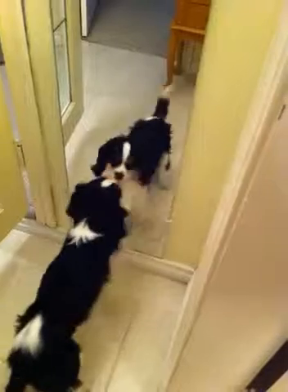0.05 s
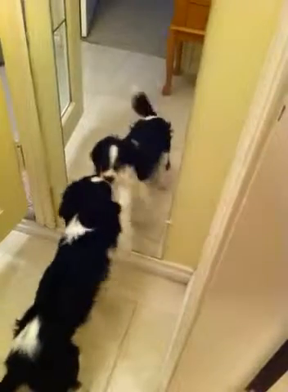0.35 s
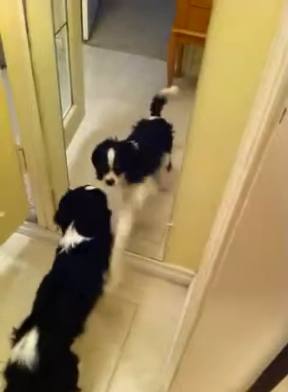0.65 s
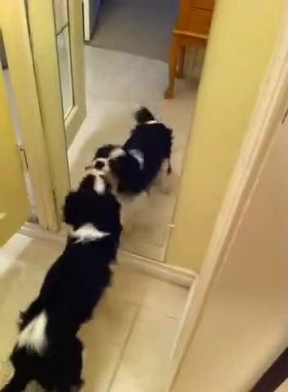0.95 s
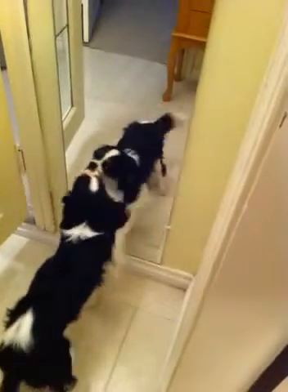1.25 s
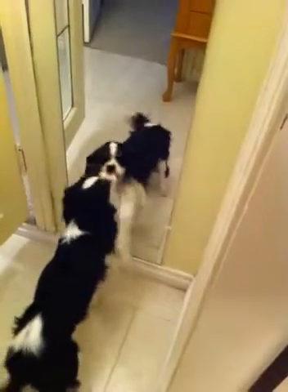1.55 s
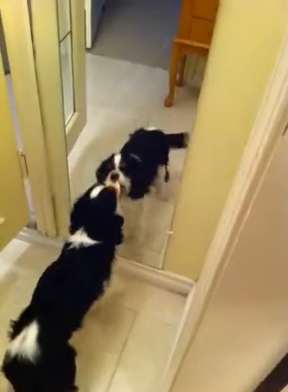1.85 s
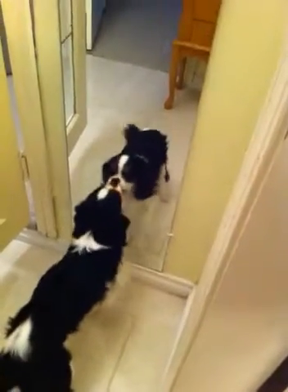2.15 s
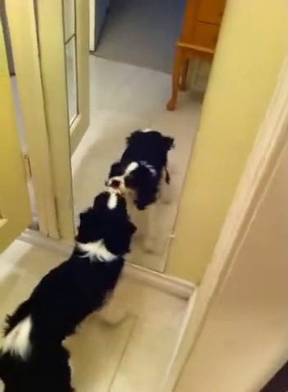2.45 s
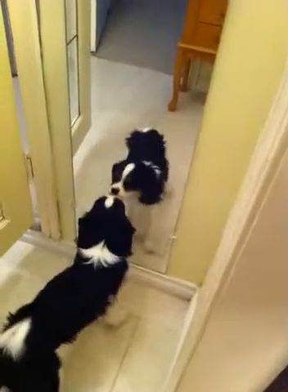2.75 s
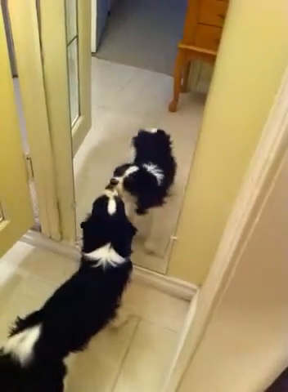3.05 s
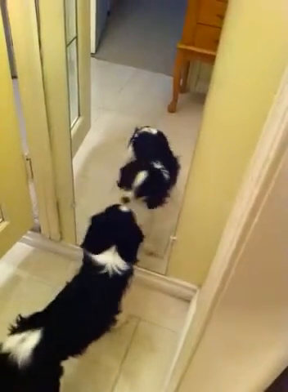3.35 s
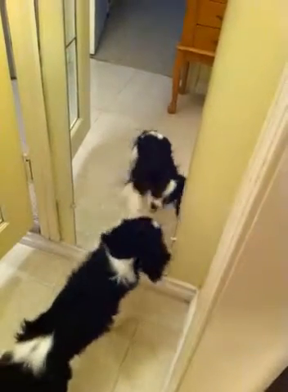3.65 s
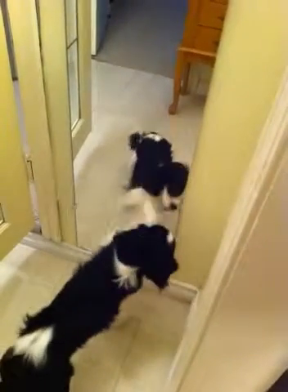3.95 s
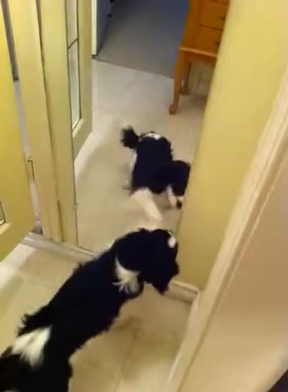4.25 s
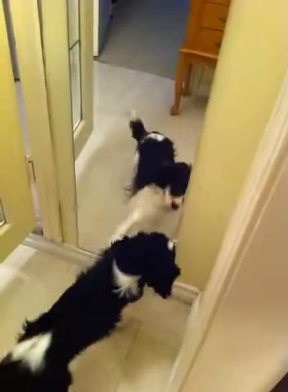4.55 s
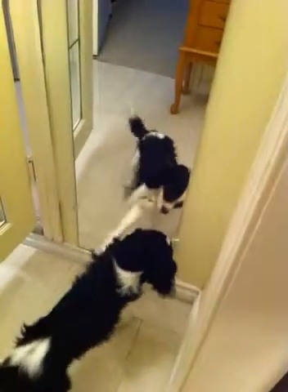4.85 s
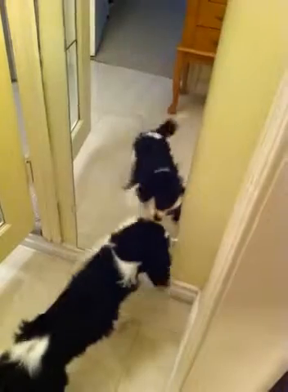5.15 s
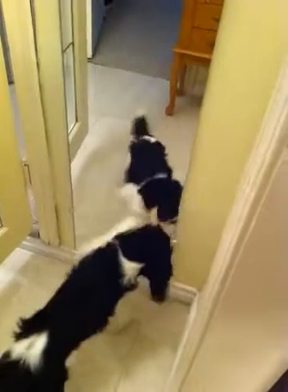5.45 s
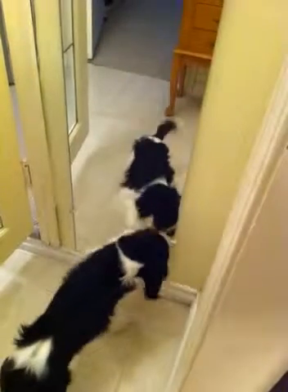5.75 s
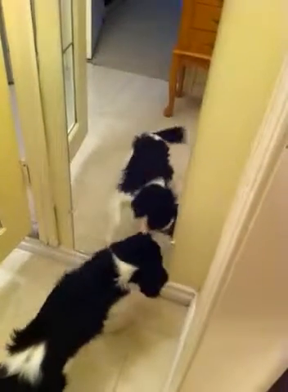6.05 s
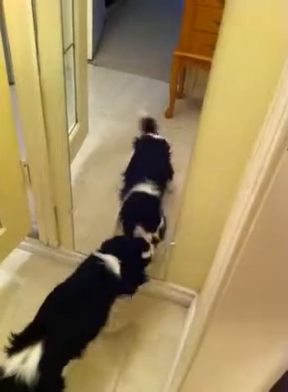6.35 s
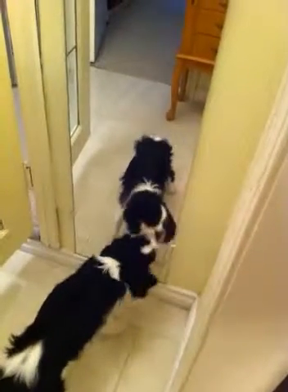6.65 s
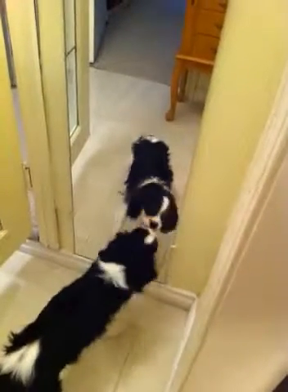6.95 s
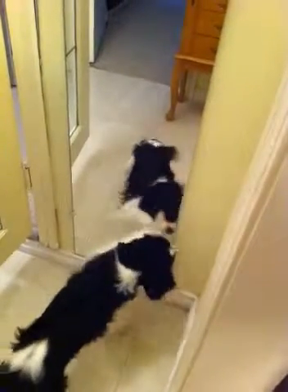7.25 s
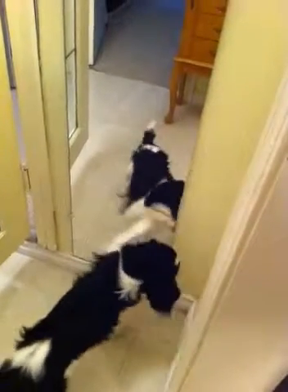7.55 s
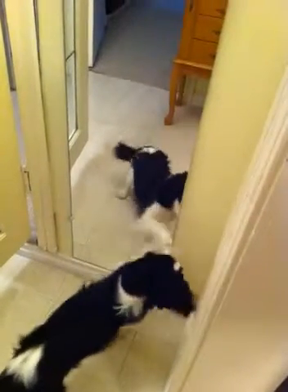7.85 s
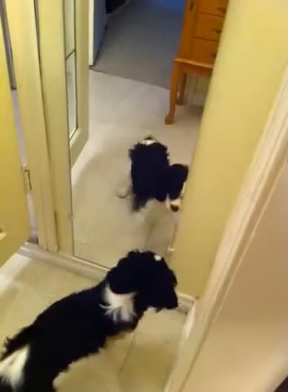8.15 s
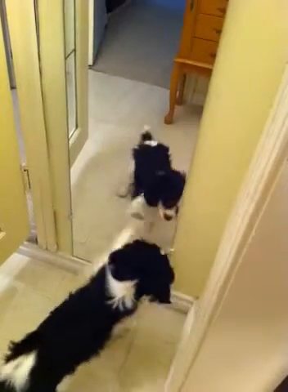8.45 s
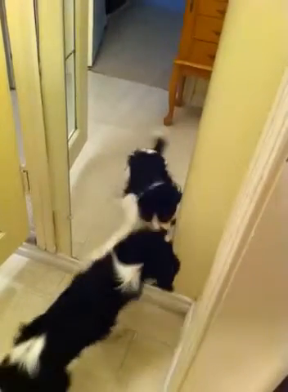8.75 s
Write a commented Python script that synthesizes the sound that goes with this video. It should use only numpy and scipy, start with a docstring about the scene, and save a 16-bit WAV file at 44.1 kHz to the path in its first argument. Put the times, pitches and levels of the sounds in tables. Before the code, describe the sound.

Sharp little claw clicks come in irregular clusters as a puppy taps a mirror and a tiled floor in a hallway. Light rubs, dull muzzle ticks and an occasional hollow bump of the door panel mix in. After a lull come several stronger single taps, then a burst of scratching and one last click. Faint fur rustle and low ventilation hum lie underneath, heard through a single microphone.

```python
"""In a tiled hallway a puppy paws at a mirrored closet door. Its claws click on glass and floor,
each impact exciting the resonances of the struck surface; pads and muzzle make duller ticks.
Sliding paws rub by stick-slip friction, and an occasional bump sets the door panel booming in its
low modes. The hard walls reverberate briefly, over a faint rustle of fur and a low ventilation hum."""
import sys
import numpy as np
from scipy import signal
from scipy.fft import rfft, irfft, next_fast_len
from scipy.io import wavfile
from scipy.ndimage import map_coordinates

SR = 44100
rng = np.random.default_rng(int(sys.argv[2]) if len(sys.argv) > 2 else 0)


def waveform_to_disk(signal):
    """Save audio, clipped to [-1, 1], as 16-bit WAV at the path in sys.argv[1]."""
    frames = np.transpose(np.atleast_2d(signal))
    scaled = np.clip(frames, -1, 1) * 32767
    samples = np.round(scaled).astype(np.int16)
    wavfile.write(sys.argv[1], SR, samples)


N = 388080

# claw impacts: (time [s], relative level [dB], body [dB], edge [dB], rebound delay [ms], ring [Hz])
CLAW_STRIKES = [(0.1842, -51.5, 0, -0.5, 1.12, 4100), (0.3267, -55.5, 7.5, -22, 0.54, 3300),
                (0.3824, -63.5, -7, -1.5, 0.29, 4170), (0.8224, -43, -4, -5.5, 0.42, 4050),
                (1.085, -63.5, 9.5, 5.5, 0.28, 4300), (1.2524, -58, -2, -2, 1.06, 4140),
                (1.567, -37.5, -8, 1.5, 0.76, 4050), (1.5826, -46, -4, -24, 0.36, 2430),
                (1.8749, -66.5, 15, -21, 1.3, 2900), (1.936, -65.5, 13, 1, 0.27, 4050),
                (3.5133, -44, -4, 2, 0.53, 4180), (3.555, -51.5, -3, -2.5, 0.35, 4100),
                (3.86, -33.5, -5, 1.5, 2.3, 4120), (4.185, -31, -4.5, 2.5, 1.37, 2270),
                (4.511, -30.5, -3.5, 3, 1.06, 4100), (4.864, -29, -4, -2, 0.86, 3500),
                (5.031, -59, -6, 2.5, 0.41, 4240), (5.2, -37.5, -2, -5.5, 0.75, 4150),
                (5.288, -66, 0, 1, 0.45, 5500), (5.549, -64, 7, -7, 0.77, 4300),
                (5.7714, -60.5, -6, -1.5, 0.28, 5580), (5.867, -50.5, 5.5, -3, 0.32, 1090),
                (6.398, -60, -4, 7.5, 0.22, 6600), (7.1954, -42.5, 4.5, -15, 0.976, 2550),
                (7.253, -62.5, 11.5, -18, 0.59, 4270), (7.548, -37.5, -3, -3, 0.52, 4770),
                (7.567, -40.5, -6, -0.5, 0.59, 5140), (7.6973, -36.5, 3, -2, 1, 3630),
                (7.709, -37, 3.5, -9, 0.29, 5200), (7.8387, -47.5, -4, -7, 0.34, 4280),
                (7.862, -49.5, -6, 0, 0.38, 4250), (7.978, -45, -7, -4, 0.45, 4170),
                (7.9927, -41.5, 2, -9, 0.38, 7900), (8.237, -61, -9, 8.5, 0.21, 6500),
                (8.5939, -30, -7.5, -2, 0.58, 1600)]
# spectrum of a claw contact: (frequency [Hz], relative level [dB])
CLAW_SPECTRUM = [(60, -17), (350, -29.5), (750, -4.5), (1200, -3.5), (2500, -0.5), (3600, -0.5),
                 (5000, -0.5), (8000, 0.5), (13000, -0.5), (15500, -4.5)]
# modes of the mirror glass: (frequency [Hz], relative level [dB])
GLASS_MODES = [(2920, -4), (3430, 2), (3900, 1), (4754, -41), (5700, -2), (5930, 5), (6550, 0.5),
               (7350, -15), (7550, -5), (8310, -2), (8708, -16), (9170, -6), (10000, 2.5), (10750, -1),
               (11395, -21), (12080, -1)]
# soft blows on the door: (time [s], relative level [dB], knock over boom [dB], base 60 dB decay time [s])
DOOR_BUMPS = [(1.087, -53.5, -0.5, 0.22), (1.254, -47, 1, 0.29), (1.935, -39.5, -10, 0.32),
              (5.0, -57, -1, 0.48), (7.697, -44.5, -4, 0.3), (7.717, -37.5, -4.5, .15),
              (7.991, -57.5, 7.5, 0.22)]
# modes of the door panel: (frequency [Hz], relative level [dB], decay time factor [1])
PANEL_MODES = [(146.2, -6, 1.9), (172, 5, 0.88), (209.4, -3.5, 1.77), (229.4, 3.5, 1.21),
               (287.2, -0.5, 0.96), (304.5, -12, 0.77)]
# spectrum of a padded knock: (frequency [Hz], relative level [dB])
KNOCK_SPECTRUM = [(30, -17), (80, -17), (140, 1), (300, -1.5), (600, -5), (900, -8.5), (1400, -19.5),
                  (3000, -28), (8000, -81)]
# sliding paws and claws: (time [s], nominal length [s], relative level [dB], body [dB], edge [dB])
PAW_SLIDES = [(0.109, 0.07, -61, 1, -19), (0.191, 0.038, -50, -7.5, -5.5), (0.505, 0.075, -61, -3.5, -19),
              (0.579, 0.052, -60, 0, -2.5), (0.956, 0.095, -62, -3, -16), (1.025, 0.062, -66, 0, 0),
              (1.656, 0.081, -69.5, 4.5, -18), (1.719, 0.047, -63.5, 2.5, -6), (2.818, 0.068, -70.5, 0, -7),
              (3.135, 0.16, -77, 8, -18), (3.719, 0.086, -66.5, -3, -7), (5.344, 0.03, -67, 7, 0.5),
              (5.379, 0.039, -70.5, 7, 2.5), (6.052, 0.15, -68.5, -6, -2), (7.411, 0.062, -66.5, -4, -12),
              (7.688, 0.065, -41, 2, -8.5), (7.828, 0.018, -49, -4, -6.5), (8.04, 0.087, -55, 3.5, -13),
              (8.083, 0.029, -44, -13, -7), (8.112, 0.05, -47, -4, -13.5)]
# touches of pads and muzzle: (time [s], level [dB], resonance [Hz])
SOFT_TOUCHES = [(2.384, -64.5, 1680), (2.644, -61, 2410), (2.922, -68, 1600), (4.034, -68.5, 1900),
                (4.342, -63, 1240), (4.661, -65.5, 1390), (4.9942, -52, 1180), (5.563, -61.5, 1690),
                (6.7806, -65, 2510)]
# spectrum of the ventilation noise: (frequency [Hz], relative level [dB])
RUMBLE_SPECTRUM = [(20, -31), (42, -23.5), (65, -23), (85, -13.5), (115, -1), (150, 2), (200, -7.5),
                   (290, -6), (400, -12), (500, -10), (700, -14), (1200, -20.5), (2200, -26), (5000, -31.5),
                   (15500, -29.5)]
# resonances of the hallway: (frequency [Hz], bandwidth [Hz], relative level [dB])
HALLWAY_MODES = [(150.8, 19, 2.3), (259, 14, 2.8), (313, 14, 6.4), (356.5, 9.8, 3.2), (473, 52, 4.2),
                 (939, 43, 7)]
# ventilation tones: (frequency [Hz], mean level [dB])
VENT_TONES = [(52, -91), (151, -74), (259, -74.5), (360.7, -76), (479, -80.5)]

GRAZE_S = 0.004  # a claw grazes for this long before it lands


def claws(gain_db=5):
    """Impact sound: every claw strike on mirror or tile radiates one short click."""
    track = np.zeros(N)
    for s, db, *contact in CLAW_STRIKES:
        add(track, s - GRAZE_S, amp(db + gain_db) * claw_click(*contact))
    return track


def claw_click(body_db, edge_db, rebound_ms, ring_hz, snap_db=2, snap_s=0.0017, snap_width_s=0.0014,
               graze_db=-12, rebound_gain=0.32, glass_db=-6, glass_spread_db=4.5, glass_width_hz=60,
               ring_db=1.5, ring_q=10):
    """Impulse excitation: a claw grazes, lands and rebounds, ringing the glass and the struck spot."""
    t = np.arange(SR // 4) / SR
    lead = round(GRAZE_S * SR)
    snap = rng.standard_normal(len(t)) * np.exp(-.5 * ((t - snap_s) / snap_width_s) ** 2)
    impact = amp(snap_db) * snap + hallway(t)
    graze = amp(graze_db) * rng.standard_normal(lead) * np.linspace(0, 1, lead)
    contact = np.concatenate([graze, impact / np.std(impact[t < .015])])
    # the rebound interferes with the first contact: a comb filter that gives each click its own pitch
    comb = lambda f: 1 + rebound_gain * np.exp(-2j * np.pi * f * rebound_ms / 1000)
    # each spot on the glass excites the modes at other strengths
    modes = [(hz, glass_width_hz, db + rng.normal(glass_db, glass_spread_db)) for hz, db in GLASS_MODES]
    modes.append((ring_hz, ring_hz / ring_q, ring_db - 0.3 * edge_db))  # a blunt claw rings the spot more
    click = filtered(contact, lambda f: comb(f) * (1 + resonances(modes, f)))
    return claw_colour(click, body_db, edge_db)


def claw_colour(x, body_db, edge_db):
    """Contact sharpness sets the spectrum: a blunt touch has more body (mids), a tip more edge (treble)."""
    touch = [(600, 1.8 * body_db), (1200, body_db), (2000, body_db), (3100, 0), (4300, 0),
             (6500, 0.74 * edge_db), (10500, edge_db), (16000, 1.7 * edge_db)]
    return coloured(x, lambda f: along(CLAW_SPECTRUM, f) + along(touch, f))


def door(swell_s=0.0098, knock_t60=0.27, hard_db=-40, nudge_db=-31.5, nudge_knock_db=-1, nudge_t60=0.67):
    """Damped modal vibration: a padded blow knocks dully and the loose panel swells into its low modes."""
    track, t = np.zeros(N), np.arange(SR // 2) / SR
    onset = t < .04
    # hard claw strikes also nudge the door
    nudges = [(s, db + nudge_db, nudge_knock_db, nudge_t60) for s, db, *_ in CLAW_STRIKES if db > hard_db]
    for s, db, knock_db, t60 in DOOR_BUMPS + nudges:
        boom = np.zeros(len(t))
        for hz, mode_db, decay_factor in PANEL_MODES:
            envelope = amp(mode_db + rng.normal(0, 1.15)) * fade(t, t60 * decay_factor)
            detuned_hz = hz * rng.normal(1, 0.012)
            boom += envelope * np.sin(2 * np.pi * (detuned_hz * t + rng.random()))
        boom *= 1 - np.exp(-(t / swell_s) ** 2)
        burst = rng.standard_normal(len(t)) * fade(t, knock_t60)
        knock = coloured(burst, lambda f: along(KNOCK_SPECTRUM, f))
        blow = boom / np.std(boom[onset]) + amp(knock_db) * knock / np.std(knock[onset])
        add(track, s, amp(db) * blow)
    return track


def paw_slides(gain_db=7, slips_per_s=1000, slip_spread_db=5):
    """Stick-slip friction: a sliding paw catches and lets go in tiny impulses, smeared by wall echoes."""
    track, t = np.zeros(N), np.arange(SR // 4) / SR
    for s, length, db, body_db, edge_db in PAW_SLIDES:
        stroke = np.sin(np.pi * np.clip(t / (0.75 * length), 0, 1))
        slipping = rng.random(len(t)) < slips_per_s / SR
        strength = amp(slip_spread_db * rng.standard_normal(len(t)))
        slips = slipping * strength * rng.choice([-1, 1], len(t))
        rub = signal.fftconvolve(slips * stroke, hallway(t))[:len(t)]
        rub /= np.sqrt(np.sum(rub ** 2) / (length * SR))
        add(track, s, amp(db + gain_db) * claw_colour(rub, body_db, edge_db))
    return track


def soft_ticks(ring_q=1.2, cutoff_ratio=0.72):
    """Compliant contact: pads and muzzle excite one broad resonance with little treble; the walls echo."""
    track, t = np.zeros(N), np.arange(SR // 4) / SR
    for s, db, hz in SOFT_TOUCHES:
        mode = [(hz, hz / ring_q, 0)]
        tick = filtered(hallway(t), lambda f: resonances(mode, f) * lowpass(f, cutoff_ratio * hz))
        add(track, s, amp(db) * tick / np.std(tick[t < .03]))
    return track


def hallway(t, near_t60=0.13, far_t60=0.35, far_db=-15, dull_hz=8000, build_s=0.0021):
    """Reverberation: dense reflections off the near walls, and a weaker, duller tail from down the hall."""
    near = rng.standard_normal(len(t)) * fade(t, near_t60)
    far = filtered(rng.standard_normal(len(t)), lambda f: lowpass(f, dull_hz)) * fade(t, far_t60)
    return (near + amp(far_db) * far) * (1 - np.exp(-t / build_s))


def fur(rest_db=-76, stir_db=3, restless_db=2.5, reach_s=0.5):
    """Friction noise: the coat rustles faintly and unevenly, more where the strikes crowd together."""
    t = np.arange(N) / SR
    crowding = sum(np.maximum(1 - np.abs(t - s) / reach_s, 0) for s, *_ in CLAW_STRIKES)
    stir = np.tanh(crowding / 2)
    rustle = unit(claw_colour(rng.standard_normal(N), body_db=-0.5, edge_db=-8.5))
    return amp(rest_db + stir * (stir_db + restless_db * wobble(15))) * rustle


def ventilation(noise_db=-61, modes_db=-6, waver_db=3):
    """Room resonance: the hallway's modes lift the ventilation rumble, amid wavering tones and faint hiss."""
    t = np.arange(N) / SR
    tones = np.zeros(N)
    for hz, db in VENT_TONES:
        envelope = amp(db + waver_db * wobble(3.024))
        tones += envelope * unit(np.sin(2 * np.pi * hz * t + wobble(4)))
    room_gain = lambda f: np.abs(1 + amp(modes_db) * resonances(HALLWAY_MODES, f))
    rumble = filtered(rng.standard_normal(N), lambda f: amp(along(RUMBLE_SPECTRUM, f)) * room_gain(f))
    return amp(noise_db) * unit(rumble) + tones


def amp(db):
    """Amplitude ratio of a level in decibels."""
    return 10 ** (np.asarray(db) / 20)


def unit(x):
    """Normalisation to an rms of 1."""
    return x / np.sqrt(np.mean(x ** 2) + 1e-20)


def along(points, hz):
    """Interpolation of (frequency [Hz], level [dB]) points on a logarithmic frequency axis."""
    frequencies, levels = np.transpose(points)
    return np.interp(np.log(hz + 1), np.log(frequencies + 1), levels)


def filtered(x, response):
    """Linear filtering: the spectrum of x times a frequency response."""
    size = next_fast_len(len(x) + SR // 20, real=True)
    return irfft(rfft(x, size) * response(np.fft.rfftfreq(size, 1 / SR)), size)[:len(x)]


def coloured(x, gain_db, size=2048):
    """Minimum-phase filtering: folding the cepstrum makes the response gain_db(f) causal."""
    cepstrum = irfft(np.log(amp(gain_db(np.fft.rfftfreq(size, 1 / SR)))))
    cepstrum[1:size // 2] *= 2
    cepstrum[size // 2 + 1:] = 0
    impulse_response = irfft(np.exp(rfft(cepstrum)))
    return signal.fftconvolve(x, impulse_response)[:len(x)]


def lowpass(f, cutoff_hz, order=2):
    """Maximally flat low-pass magnitude response."""
    return 1 / np.sqrt(1 + (f / cutoff_hz) ** (2 * order))


def resonances(modes, f):
    """Summed response of damped oscillators: (frequency [Hz], bandwidth [Hz], peak gain [dB])."""
    return sum(amp(db) * 1j * f * width / (hz * hz - f * f + 1j * f * width) for hz, width, db in modes)


def fade(t, t60):
    """Exponential decay, by 60 dB in t60 seconds."""
    return np.exp(-np.log(1000) * t / t60)


def wobble(knots_per_s):
    """Slow random modulation: a spline through Gaussian knots."""
    knots = rng.standard_normal(int(N * knots_per_s / SR) + 4)
    coarse = np.arange(0, N, SR // 200)
    return np.interp(np.arange(N), coarse, map_coordinates(knots, [coarse * knots_per_s / SR]))


def add(track, s, sound):
    """Superposition of a sound on the track, starting at s seconds."""
    part = track[max(round(s * SR), 0):][:len(sound)]
    part += sound[:len(part)]


def scene():
    """Superposition: the puppy's sounds and the ventilation sum in one channel."""
    return (claws() + soft_ticks() + paw_slides() + door() + fur() + ventilation())[None]


def record(dry, top_hz=15900):
    """Band limiting: the microphone cuts off steeply above top_hz."""
    return np.array([filtered(channel, lambda f: lowpass(f, top_hz, order=80)) for channel in dry])


dry = scene()
out = record(dry)
waveform_to_disk(out)
```